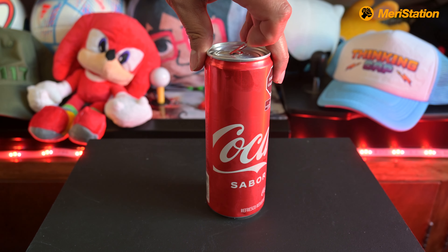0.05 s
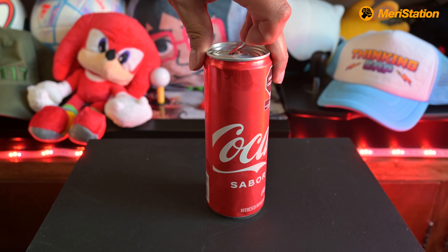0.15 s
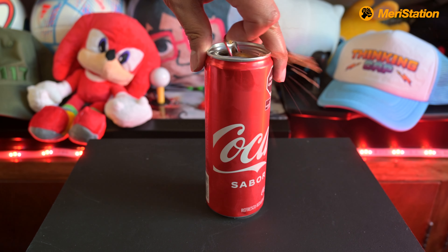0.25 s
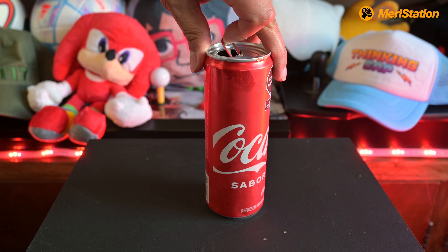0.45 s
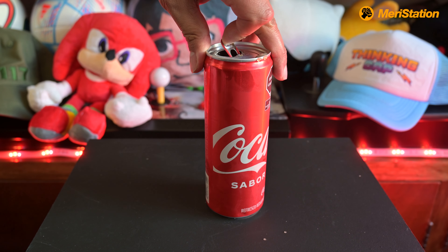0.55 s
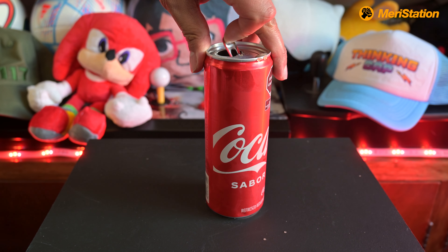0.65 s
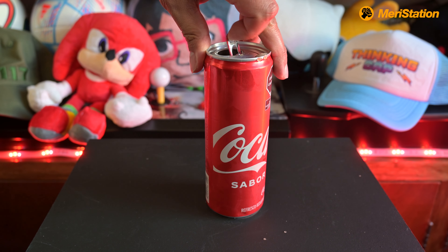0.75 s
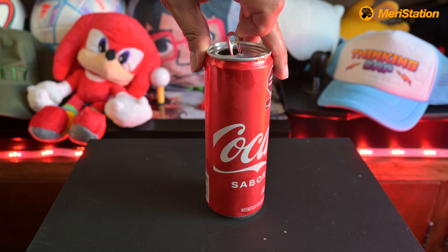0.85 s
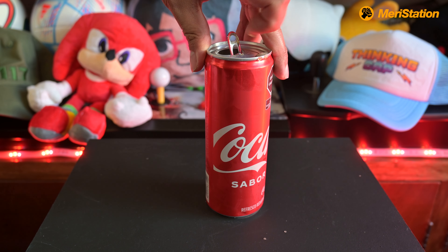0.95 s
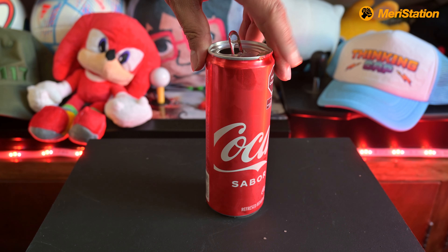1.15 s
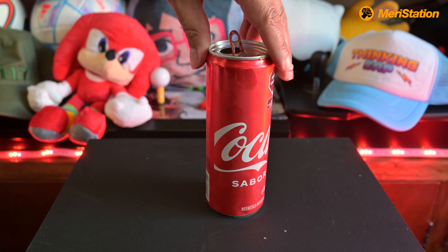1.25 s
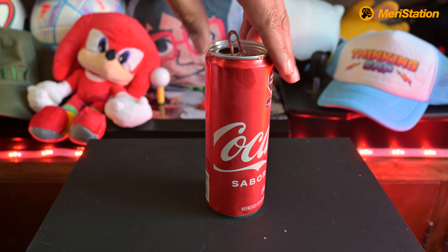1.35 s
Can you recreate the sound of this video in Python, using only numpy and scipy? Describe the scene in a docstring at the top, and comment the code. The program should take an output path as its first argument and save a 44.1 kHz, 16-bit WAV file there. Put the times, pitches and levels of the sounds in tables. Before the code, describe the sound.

A ring-pull drinks can cracks open with a loud burst of gas, then fizzes softly.

```python
"""A faint leak of gas, already fading behind the closed lid, then a ring-pull drinks can torn open.
The can is on a table, close to the microphone. Fading noise rings the lid for the leak; loud noise bursts, with
a low hiss in a gap between them, tear the score line and overload the input. The gas rushes out as a coloured
jet over a humming headspace, and random bubble bursts fizz in the open can. The tab clicks, rattles and creaks
as it is folded, and the can bumps the table, over steady room tone and faint noise of the channels."""
import sys
import numpy as np
from scipy.fft import rfft, irfft, next_fast_len
from scipy.io import wavfile
from scipy.ndimage import map_coordinates

SR = 44100
rng = np.random.default_rng(int(sys.argv[2]) if len(sys.argv) > 2 else 0)


def output_pcm(signal):
    """Save a mono or channel-first signal as 16-bit PCM at the path in sys.argv[1].

    Samples are clipped to [-1, 1] before scaling.
    """
    pcm = np.clip(np.atleast_2d(signal).T, -1, 1) * 32767
    wavfile.write(sys.argv[1], SR, np.round(pcm).astype(np.int16))


N = 61739
T = np.arange(N) / SR

# Resonances of the open lid. Each row: centre in Hz, width in Hz, level in dB.
OPEN_LID = [(1240, 240, -5.5), (2500, 440, -11), (3003, 167, 0), (4360, 150, 1), (4850, 590, -15.5),
            (5930, 250, -9), (7530, 390, -7.5), (9030, 740, -16)]


def amp(db):
    """Turn dB into gain."""
    return 10 ** (np.asarray(db) / 20)


def unit(x):
    """Scale to an rms of 1."""
    return x / np.sqrt(np.mean(x ** 2) + 1e-20)


def level_curve(rows):
    """Gain through (seconds, dB) points, all but silent outside them."""
    seconds, db = np.transpose(rows)
    return amp(np.interp(T, seconds, db, left=-120, right=-120))


def filtered(x, response):
    """Filter x by a response given as a function of frequency in Hz."""
    size = next_fast_len(N + SR // 2)  # spare room for the ringing to die away
    spectrum = rfft(x, size) * response(np.fft.rfftfreq(size, 1 / SR))
    return irfft(spectrum, size)[..., :N]


def colour(points):
    """Gain through (Hz, dB) points on a logarithmic frequency axis."""
    f, db = np.transpose(points)
    return lambda hz: amp(np.interp(np.log(hz + 1), np.log(f + 1), db))


def body(modes):
    """Response of an object as a sum of damped resonances with alternating sign."""
    def response(f):
        total = 0
        for k, (centre, width, db) in enumerate(modes):
            resonance = 1j * f * width / (centre ** 2 - f ** 2 + 1j * f * width)
            total = total + (-1) ** k * amp(db) * resonance
        return total
    return response


def high_pass(cut_hz, order):
    """Treble gain that rises to 1 above the cut, without shifting phase."""
    return lambda f: f ** order / (f ** order + cut_hz ** order)


def noise(response):
    """Steady noise shaped by a response, at an rms of 1."""
    return unit(filtered(rng.standard_normal(N), response))


def burst(start, hold, t60):
    """Envelope with a sudden start, a hold, then a fall of 60 dB in t60 seconds."""
    return (T >= start) * amp(-60 * np.clip(T - start - hold, 0, 1) / t60)


def wobble(rate):
    """Smooth random curve through `rate` random knots a second."""
    knots = rng.standard_normal(int(N * rate / SR) + 4)
    return map_coordinates(knots, [T * rate])


def spikes(rate, spread_db):
    """Random impulses of either sign, on average `rate` a second, of widely spread size."""
    happens = rng.random(N) < rate / SR
    size = amp(spread_db * rng.exponential(size=N).clip(0, 3))
    return happens * rng.choice([-1, 1], N) * size


def impulses(rows):
    """Single-sample pushes at (seconds, dB)."""
    x = np.zeros(N)
    for seconds, db in rows:
        x[round(seconds * SR)] = amp(db)
    return x


def rips():
    """Each tear is a blast of broad noise that also rings the lid; a low hiss fills the gap between tears."""
    # Tears, and the low gap hiss in the second row.
    # Each row: start in seconds, hold in seconds, level in dB, t60 in seconds, share of open lid from 0 to 1.
    blasts_and_hiss = [(.2336, .0011, 1, .005, 0), (.2345, .016, -19, .01, 0), (.2388, .0028, 1, .005, 0),
                       (.2507, .0035, -2, .005, .3), (.2545, .0028, 1, .011, 1)]
    # Colour of the noise. Each row: frequency in Hz, density in dB per Hz.
    air_colour = [(88, -60), (200, -31), (700, -29), (1900, 0.5), (3000, -4), (5100, 4), (6800, -10),
                  (8500, 4.5), (10500, -14), (13000, -30), (15500, 1.5)]
    # Lid while it tears. Each row: centre in Hz, width in Hz, level in dB.
    strained_lid = [(2590, 510, -6.5), (3600, 400, -9.5), (5140, 460, 3.5), (9050, 370, -17),
                    (12060, 1150, -10)]
    lid_db, side_db = 5, -17

    air = noise(colour(air_colour))
    out = 0
    for start, hold, db, t60, opened in blasts_and_hiss:
        shape = amp(db) * burst(start, hold, t60)
        lid = lambda f: opened * body(OPEN_LID)(f) + (1 - opened) * body(strained_lid)(f)
        ringing = 2 * filtered(shape * rng.standard_normal(N), lid)
        out = out + shape * air + amp(lid_db) * ringing
    # treble noise that follows this sound, opposite in the two channels
    aside = filtered(out * rng.standard_normal(N), high_pass(7000, 2))
    return out + amp(side_db) * np.array([aside, -aside])


def closed_lid():
    """A fading leak at the rivet sounds through the closed lid, and a nail under the tab ticks."""
    # Closed lid. Each row: centre in Hz, width in Hz, level in dB.
    lid_modes = [(1760, 530, -9.5), (2200, 354, -3), (4014, 114, -0.5), (5460, 580, -2), (7560, 1200, -15),
                 (8970, 520, -13.5), (11300, 340, -24)]
    # Nail under the tab. Each row: time in seconds, push in dB.
    nail_ticks = [(0.1291, -8.5), (.1401, -8.5), (0.2228, -10.5)]
    # What the nail rings. Each row: centre in Hz, width in Hz, level in dB.
    tick_modes = [(2400, 700, -2), (3900, 170, 4), (5300, 350, 0), (7100, 500, -9), (8800, 450, -5)]
    start_db, fall_db_per_s = -25, 135  # of the noise that drives the lid

    leak = amp(start_db - fall_db_per_s * T) * rng.standard_normal(N)
    ticks = filtered(impulses(nail_ticks), body(tick_modes))
    return 2 * filtered(leak, body(lid_modes)) + ticks


def jet():
    """Gas rushing through the opening: coloured noise, ringing lid and an edge tone; its top dies first."""
    # Gas flow. Each row: time in seconds, level in dB.
    flow = [(.256, -1.5), (.268, -13.5), (.3, -16), (.33, -19.5), (.4, -24.5), (.48, -36), (.55, -44.5),
            (.62, -77)]
    # Colour of the jet. Each row: frequency in Hz, density in dB per Hz.
    jet_colour = [(88, -25), (250, -2), (500, -23), (1200, -7), (2000, -9.5), (3000, 2.5), (4500, -1),
                  (7000, -7), (10000, -10), (13000, -13), (15500, -18)]
    lid_db, flutter_db, flutter_per_s = -1, 0.5, 87
    treble_hz, treble_fall_db_per_s = 8640, 55
    whistle_hz, whistle_width_hz, whistle_db = 4460, 250, -11

    rush = unit(noise(colour(jet_colour)) + amp(lid_db) * noise(body(OPEN_LID)))
    top = filtered(rush, high_pass(treble_hz, 4))
    top_gain = amp(-treble_fall_db_per_s * abs(T - flow[0][0]))
    rush = rush - top * (1 - top_gain)
    edge_tone = body([(whistle_hz, whistle_width_hz, 0)])
    rush = rush + amp(whistle_db) * noise(lambda f: edge_tone(f) ** 2)
    return level_curve(flow) * amp(flutter_db * wobble(flutter_per_s)) * rush


def headspace():
    """Air above the drink hums with a wavering tone inside a broad gurgle."""
    # Each row: time in seconds, level in dB.
    hum_level = [(.2, -62.5), (.252, -31), (.262, -27.5), (.3, -44), (.36, -60), (.4, -52), (.435, -31.5),
                 (.46, -61), (.53, -41.5), (.6, -52.5), (.72, -58.5), (.748, -51), (.78, -56), (.9, -70)]
    # Each row: time in seconds, pitch in Hz.
    hum_pitch = [(.26, 270), (.3, 201.3), (.4, 244.2), (.45, 260), (.55, 232.7), (.72, 228), (.75, 249)]
    unrest_per_s, steady = 45.44, 0.83  # how fast it wavers, and its steady part
    gurgle_hz, gurgle_width_hz, gurgle_db = 288, 346, -5

    phase = 2 * np.pi * np.cumsum(np.interp(T, *np.transpose(hum_pitch))) / SR
    hum = (steady + wobble(unrest_per_s)) * np.sin(phase)
    hum = unit(hum + wobble(unrest_per_s) * np.cos(phase))
    gurgle = body([(gurgle_hz, gurgle_width_hz, 0)])
    hum = hum + amp(gurgle_db) * noise(lambda f: gurgle(f) ** 2)
    return level_curve(hum_level) * hum


def large_bubble():
    """One large bubble is a short tone that swells and dies in a bell shape."""
    centre_s, hz, db, life_s = 0.479, 352, -36.5, 0.01
    swell = np.exp(-((T - centre_s) / life_s) ** 2)
    return amp(db) * swell * np.sin(2 * np.pi * hz * T)


def fizz():
    """Bubbles burst over a bed of foam, the can colours both, and a fine hiss stays once it is open."""
    # Each row: time in seconds, level in dB.
    fizz_level = [(.4, -32.5), (.52, -43.5), (.62, -44.5), (.72, -42.5), (.8, -34), (.92, -40.5),
                  (1.04, -36), (1.17, -38), (1.28, -37), (1.4, -37)]
    # Colour of the foam. Each row: frequency in Hz, density in dB per Hz.
    foam_colour = [(88, -48), (170, -13), (320, -14.5), (850, -14.5), (1200, -10), (2000, -12.5),
                   (3800, -2), (8500, -17.5), (10200, -26), (13000, -15), (15500, -37)]
    # Fizzing can. Each row: centre in Hz, width in Hz, level in dB.
    can_modes = [(492.4, 16.7, 3.5), (1220, 230, -1), (2640, 530, 2.5), (3860, 790, -4), (5630, 530, 3),
                 (7370, 790, 0), (8670, 580, -1.5)]
    # Start and end of the hiss's fade-in, in seconds.
    hiss_fade = (0.46, 0.56)
    bubbles_per_s, spread_db, bubble_decay_s = 800, 4, 0.0013
    pops_db, can_db, hiss_db = 0.5, 1.5, -49

    bubble_shape = np.exp(-T[:400] / bubble_decay_s)
    envelope = np.convolve(abs(spikes(bubbles_per_s, spread_db)), bubble_shape)[:N]
    pops = unit(rng.standard_normal(N) * envelope)
    drive = rng.standard_normal(N) + amp(pops_db) * pops
    foam = unit(filtered(drive, colour(foam_colour)))
    can = unit(filtered(drive[::-1], body(can_modes)))  # reversed, so its bursts fall at other times
    hiss = np.interp(T, hiss_fade, [0, 1]) * noise(high_pass(9000, 2))
    return level_curve(fizz_level) * unit(foam + amp(can_db) * can) + amp(hiss_db) * hiss


def tab():
    """Clicks, rattles and a creak of quick slips each drive the tab's resonances in their own measure."""
    # Tab and lid. Each row: centre in Hz, width in Hz.
    tab_modes = [(420, 530), (1300, 960), (2900, 510), (4000, 2800), (9000, 3000), (13500, 9000)]
    # Each row: time in seconds, then the push in dB into each resonance.
    click_rows = [(.7500, -36, -22, -30, -45, -46, -55), (0.7698, -26, -23, -18, -14, -16.5, -28),
                  (0.7755, -54, -24, -31, -27, -34, -40), (.8270, -46, -31, -14, -38, -45, -50),
                  (0.8301, -40, -40, -23.5, -36, -45, -50), (1.0282, -32.5, -35, -50, -40, -17.5, -15),
                  (1.3531, -55, -26, -17, -18, -16.5, -1.5), (1.3718, -20, -24, -37, -42, -42, -45)]
    # The tab rattling on. Each row: start in seconds, t60 in seconds, then dB into each resonance.
    rattle_rows = [(0.7512, 0.019, -42, -32.5, -44, -39, -37.5, -55),
                   (0.7705, 0.15, -38.5, -39, -52, -31.5, -41, -58),
                   (1.3558, 0.085, -39, -37.5, -32, -48, -53, -40),
                   (1.3729, 0.1, -31.5, -35, -49, -60, -51, -48)]
    # The tab bending. Each row: time in seconds, level in dB.
    creak_level = [(.805, -50), (.808, -32.5), (.823, -40), (.828, -28), (.831, -33), (.8335, -54)]
    # The creak's level in dB into each resonance.
    creak_db = [-8, 2.5, 4, -10, -23, -22]
    slips_per_s, slip_spread_db = 12000, 2

    slips = level_curve(creak_level) * unit(spikes(slips_per_s, slip_spread_db))
    out = 0
    for k, (hz, width) in enumerate(tab_modes):
        narrowness = np.sqrt(SR / width)  # makes up for the energy a narrow resonance rejects
        clicks = narrowness * impulses([(row[0], row[1 + k]) for row in click_rows]) / 2
        shake = sum(amp(row[2 + k]) * burst(row[0], 0, row[1]) for row in rattle_rows)
        rattle = shake * rng.standard_normal(N)
        drive = clicks + rattle + amp(creak_db[k]) * slips
        ring = body([(hz, width, 0)])
        out = out + narrowness * filtered(drive, lambda f: ring(f) ** 2)
    return out


def table():
    """The can bumps the table: soft pushes ring the table top."""
    # Each row: time in seconds, relative push in dB.
    bumps = [(1.355, -28), (1.361, -32), (1.3778, -19), (1.384, -25), (1.392, -23.5)]
    # Table top. Each row: centre in Hz, width in Hz, level in dB.
    top_modes = [(207, 63, 15), (378, 130, 12.5), (910, 160, 4)]
    soft = lambda f: 1 / (1 + 1j * f / 900) ** 2  # dulls each push above 900 Hz
    return filtered(20 * impulses(bumps), lambda f: body(top_modes)(f) * soft(f))


def room_tone():
    """Steady coloured noise of the room behind the can."""
    # Each row: frequency in Hz, density in dB per Hz.
    room_colour = [(15, -32), (30, 13), (70, -6), (220, -5.5), (500, -11.5), (1000, -11.5), (2000, -12),
                   (3000, -17.5), (8000, -22.5), (15500, -27)]
    return amp(-49) * noise(colour(room_colour))


def scene():
    """The can sits in the middle, close by, with the room behind it."""
    can = rips() + closed_lid() + jet() + headspace() + large_bubble() + fizz() + tab()
    return can + table() + room_tone()


def record(dry):
    """Faint noise joins each channel, the input overloads softly, and both ends of the band are cut."""
    # Each row: frequency in Hz, density in dB per Hz.
    self_colour = [(15, -16), (30, -9), (700, -3), (2000, -15.5), (5000, -18.5), (9000, -1.5), (15500, -5)]
    self_db, ceiling, knee = -58, 1.0, 8
    low_cut_hz, top_hz = 138, 15750

    hiss = amp(self_db) * noise(colour(self_colour))
    x = dry + np.array([hiss, -hiss])  # opposite in the two channels
    x = x / (1 + abs(x / ceiling) ** knee) ** (1 / knee)
    top_cut = lambda hz: np.clip((top_hz - hz) / 250, 0, 1)  # falls to nothing over the last 250 Hz
    low_cut = lambda hz: (1j * hz / (low_cut_hz + 1j * hz)) ** 2
    return filtered(x, lambda hz: top_cut(hz) * low_cut(hz))


dry = scene()
out = record(dry)
output_pcm(out)
```